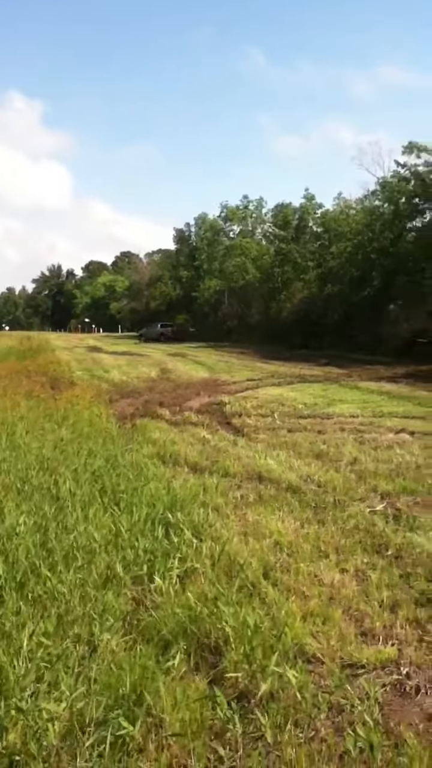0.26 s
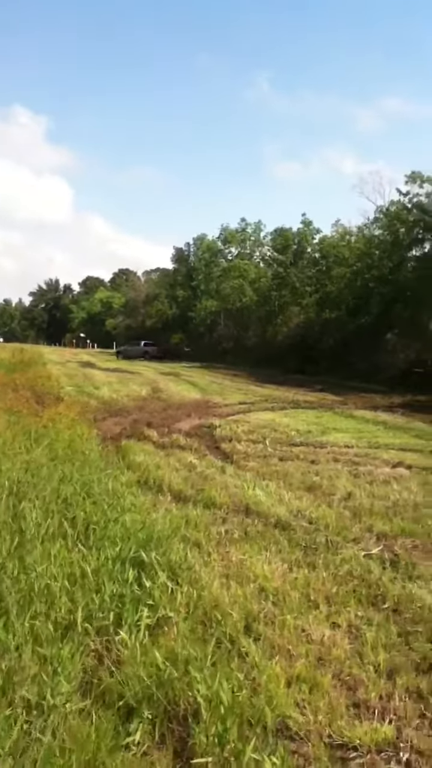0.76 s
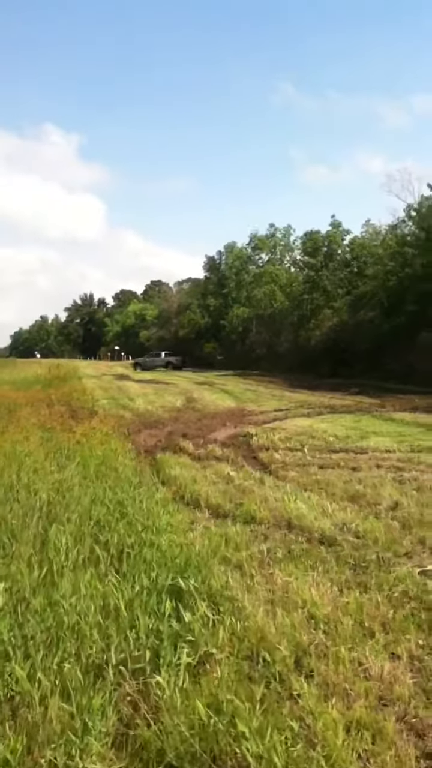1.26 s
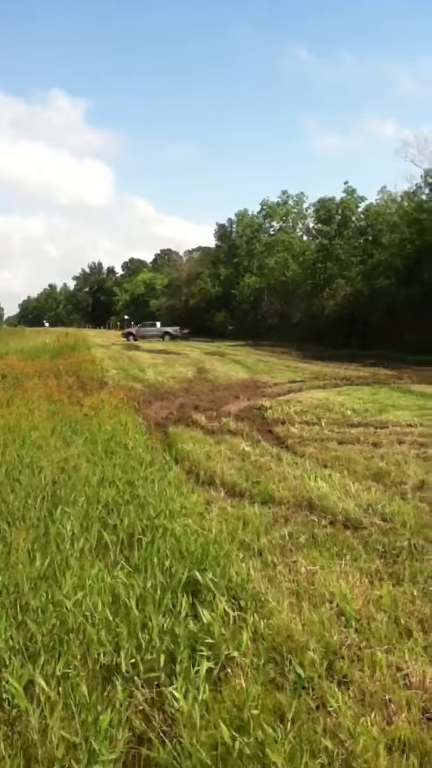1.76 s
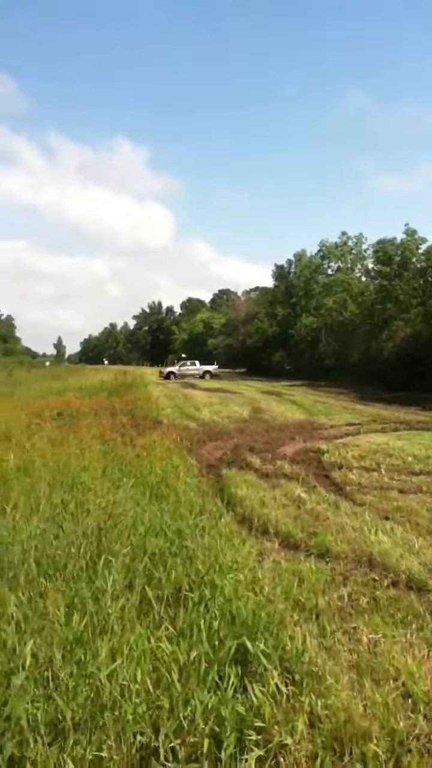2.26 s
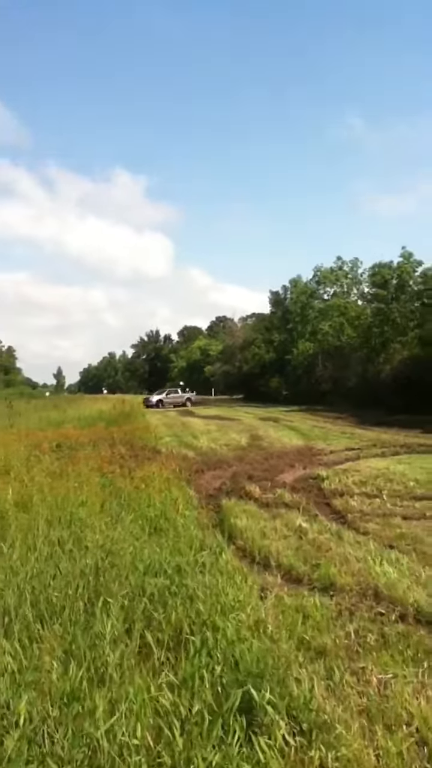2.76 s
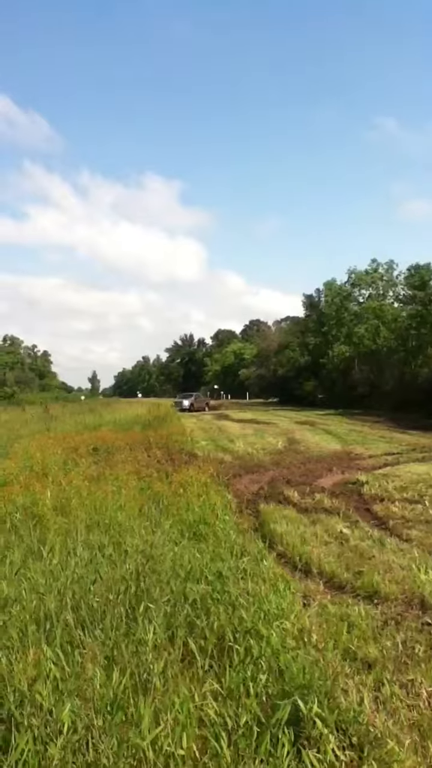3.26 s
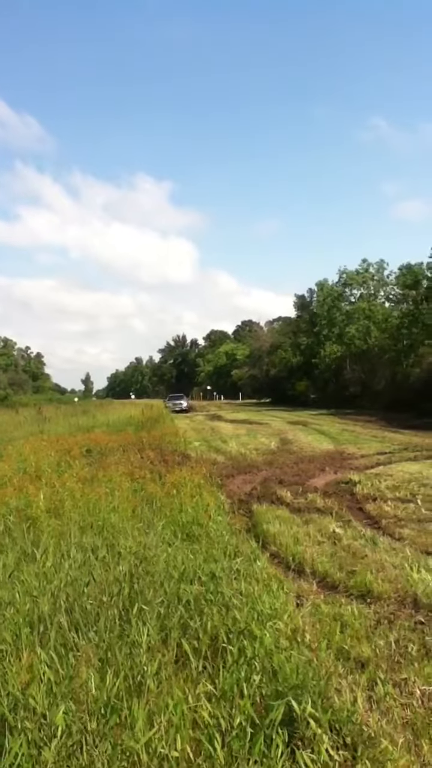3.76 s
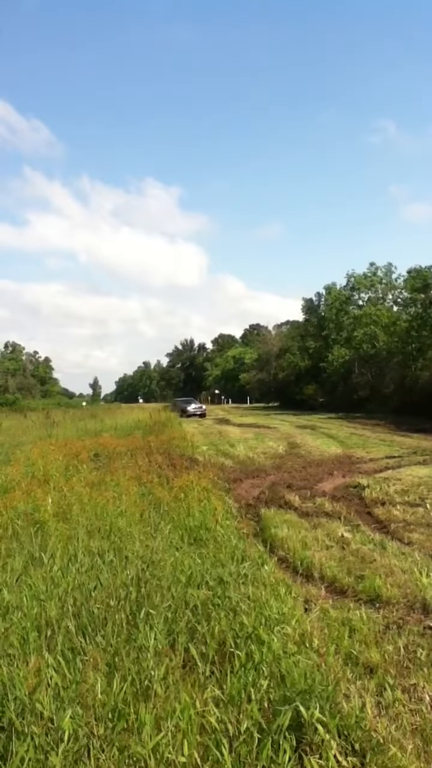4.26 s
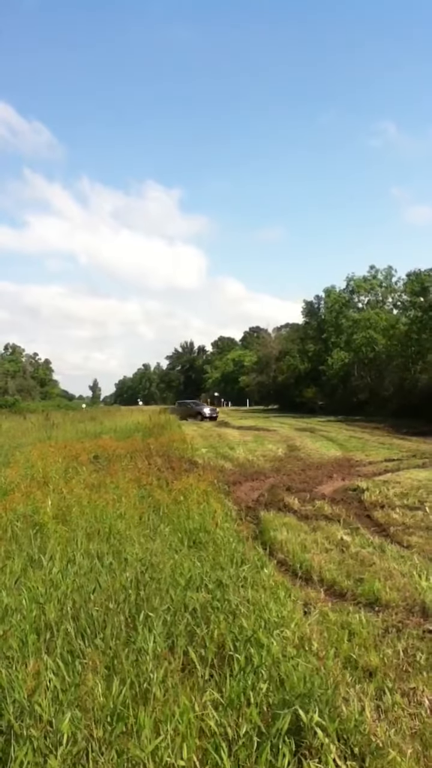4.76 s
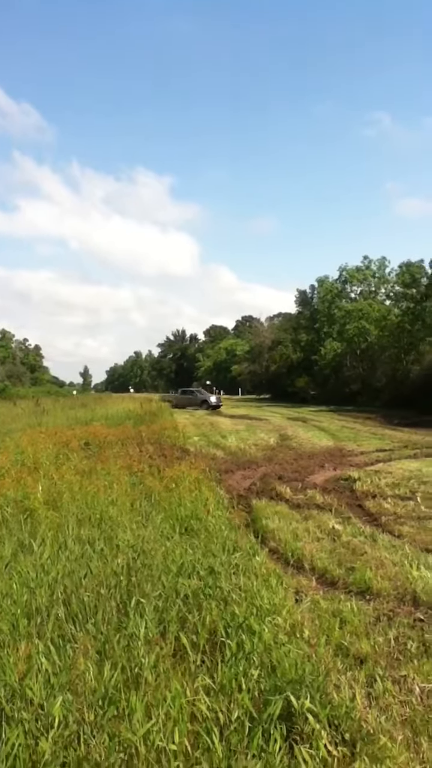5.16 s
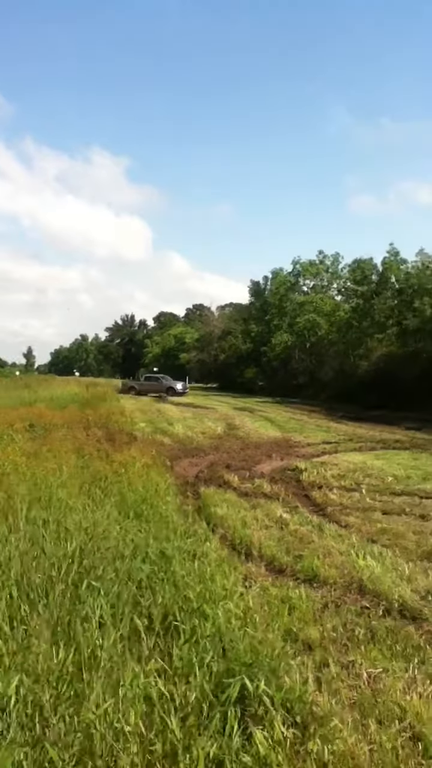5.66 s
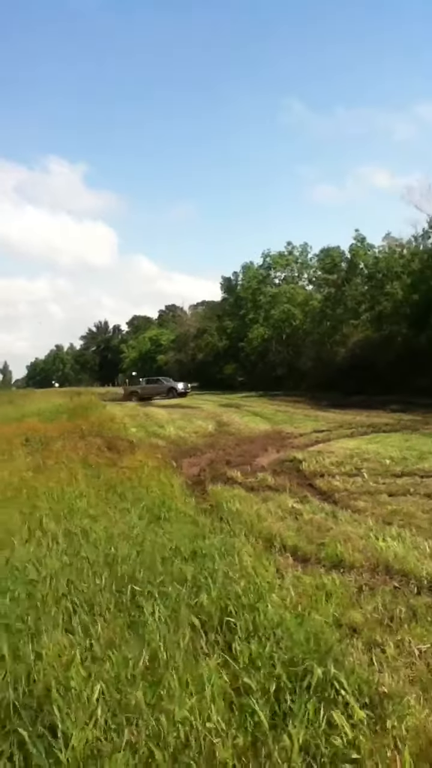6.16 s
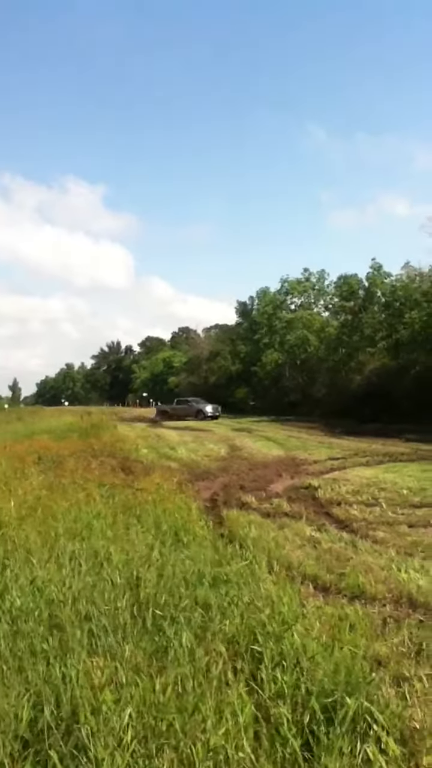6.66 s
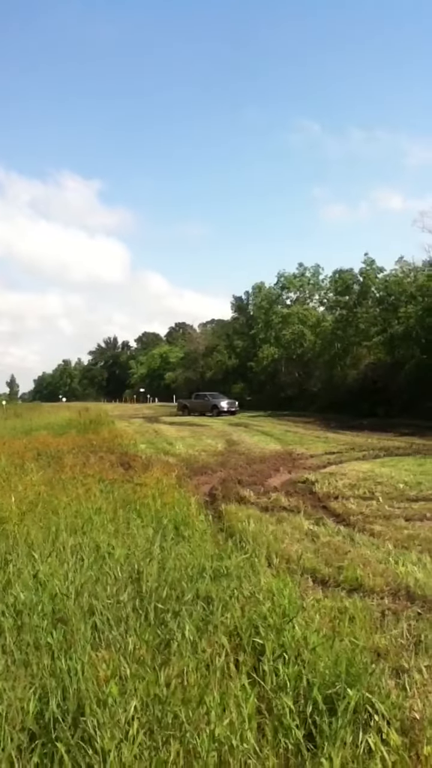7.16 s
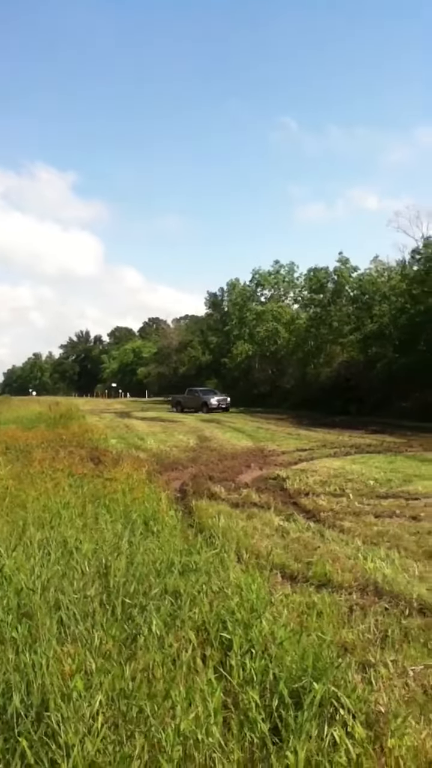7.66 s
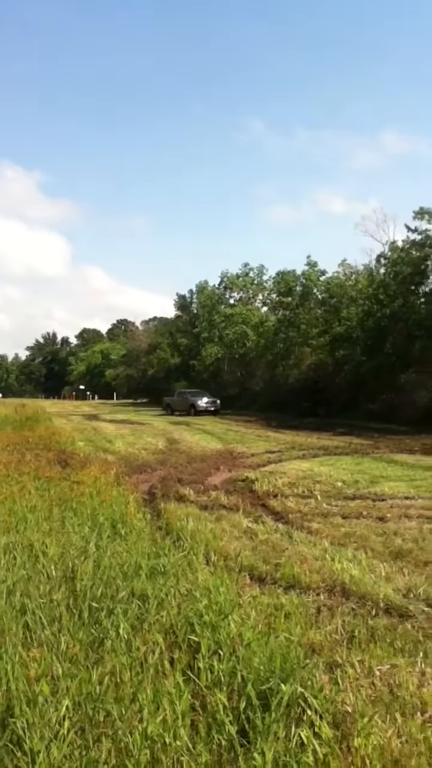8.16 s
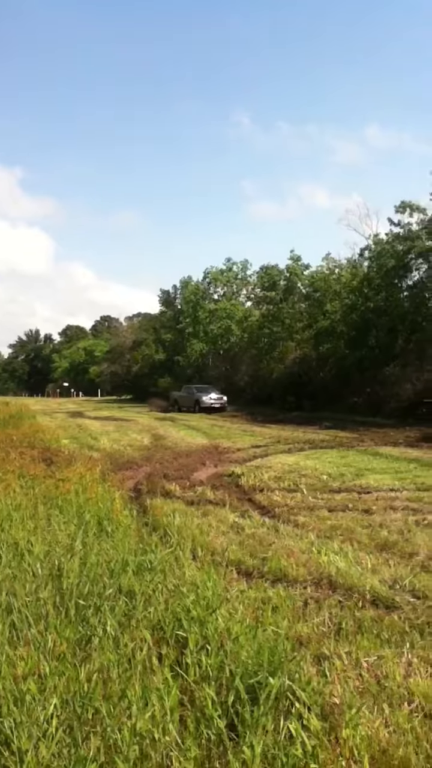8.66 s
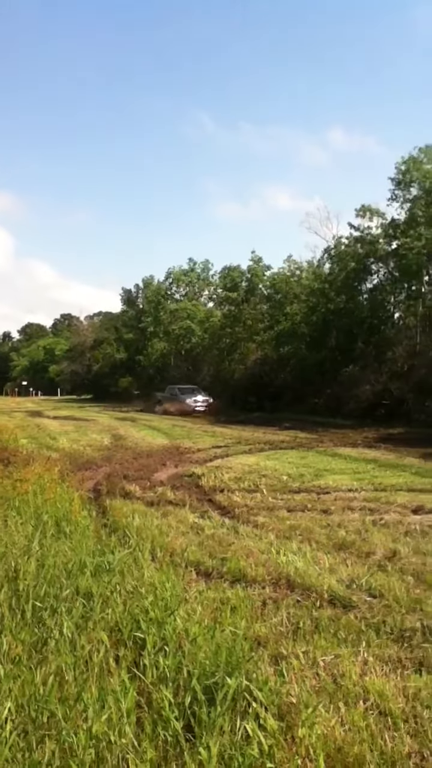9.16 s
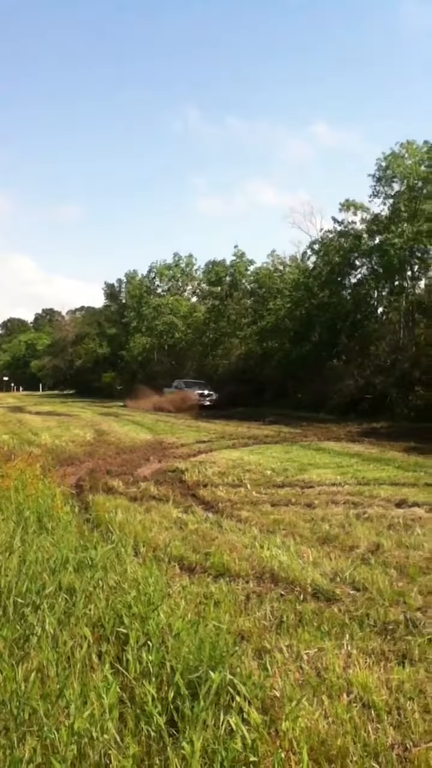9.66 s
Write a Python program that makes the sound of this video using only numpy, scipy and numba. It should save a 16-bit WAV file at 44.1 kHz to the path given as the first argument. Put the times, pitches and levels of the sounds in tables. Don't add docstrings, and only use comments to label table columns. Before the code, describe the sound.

Mono phone pickup in an open field with a faint airy hush. From 0 to 1.2 s wind flutters and thumps in low, soft blows, and nearby grass ticks and swishes, with small brushes until about 2 s. Around 1 s a V8 pickup tens of metres away begins to growl, its uneven exhaust beat climbing steadily to a high, burbling, raspy roar by 3.3 to 4.1 s, with wind bumps and a thin whine near 3.5 to 4 s. Revs drop at about 4.4 s, then climb again, pitch wobbling as tyres slip, to the loudest, brightest rush around 6 s. They fall to a deep lumpy throb near 7.3 s, waver until 8.2 s, then rise to another high pull near 9.6 s. Short whines flicker from 8.75 s onward; pitch eases slightly at the end. Trees scatter soft echoes.

```python
import sys
import numpy as np
from scipy import signal
from scipy.io import wavfile
from scipy.ndimage import uniform_filter1d
from numba import njit

SR = 44100
rng = np.random.default_rng(int(sys.argv[2]) if len(sys.argv) > 2 else 0)


def boost(x):
    u = np.asarray(x, float) / 20
    return 10 ** u


def bounce(signal):
    frames = np.transpose(np.atleast_2d(signal))
    limited = np.clip(frames, -1, 1)
    pcm = np.round(limited * 32767).astype(np.int16)
    wavfile.write(sys.argv[1], SR, pcm)


N = 437031
T = np.arange(N) / SR

# (time [s], rate [Hz])
CYCLE_RATE = [(0.82, 8.9), (1.27, 12.16), (1.6, 18.24), (3.38, 34.33), (3.83, 35.17), (4.1, 34.84),
              (4.44, 23.51), (4.85, 25.03), (6.07, 40.14), (6.42, 41.77), (6.65, 38.1), (7.36, 16.89),
              (7.59, 18.09), (7.66, 14.78), (7.96, 20.04), (8.16, 19.95), (9.63, 38.41), (9.91, 31.62)]
# (time [s], change of speed [%], length [s])
SPEED_WAVERS = [(1.87, 2.2, .35), (2.27, -1.5, .3), (2.59, -1.2, .25), (2.89, -2, .2), (3.09, 2.6, .3),
                (5.2, .7, .3), (5.53, -1.1, .25), (6.81, 1.8, .25), (7.09, -1.9, .25), (8.31, -2.5, .25),
                (8.62, 2.4, .35), (9.4, -.7, .5)]
# (time [s], firing beat [dB], lumpiness [dB], bank beat [dB re mean], burble [dB re mean])
EXHAUST_LOAD = [(.95, -49, -44, -20, -10), (1.15, -31.5, -41.5, -14, -8), (1.4, -23, -39.5, -2, -2),
                (2.05, -23, -40.5, 2.5, 3), (2.6, -20, -43.5, 1, 3), (3.3, -22, -34.5, -2, 2.5),
                (3.6, -24.5, -49.5, -6, -4.5), (4.05, -30, -42, -0.5, -2), (4.5, -23, -38, -3.5, -1),
                (5.12, -21, -36.5, -0.5, 3), (5.95, -22.5, -37, -0.5, 5), (6.3, -32, -43.5, 0.5, -5),
                (6.75, -29, -45, 2.5, 2), (7.15, -19, -39, -1.5, -2), (7.55, -23.5, -38.5, -2, -8),
                (8.2, -19, -38.5, -2, -5), (8.8, -29, -38, 1.5, -3), (9.91, -24.5, -37, -0.5, 2.5)]
# (time [s], depth [dB], length [s])
BEAT_FADES = [(1.71, -22, 0.063), (2.27, -15.5, 0.27), (2.85, -11, 0.47), (3.5, -4.5, 0.17),
              (4.16, -14, 0.056), (4.87, -14, 0.28), (5.29, -4, 0.14), (5.7, -4.5, 0.33), (6.62, -5, 0.14),
              (6.89, -18, 0.13), (7.32, -10, 0.17), (7.73, -3, .15), (7.99, -7, 0.092), (9.47, -22, 0.25),
              (9.61, -19, 0.17)]
# (frequency [Hz], level [dB])
TAILPIPE_TONE = [(50, -32), (62, -25), (75, -11), (100, -8), (135, -5.5), (190, 1), (215, -3.5)]
# (multiple of the cycle [-], level [dB])
UNEVEN_ORDERS = [(2, -5), (4, -4.5), (6, -2.5), (7, 4), (9, -1), (10, -2.5), (11, 1), (12, -12), (13, -0.5),
                 (14, -10)]
# (frequency [Hz], level [dB])
MUFFLER_TONE = [(40, -25), (70, -22), (110, -6), (170, -1.5), (240, -4.5), (305, -2.5), (335, -12.5),
                (380, -18.5), (430, -21.5), (520, -20)]
# (time [s], multiple of the cycle [-], level [dB], length [s])
PIPE_FLARES = [(3.0, 10, -36, .25), (3.27, 33, -42, .3), (4.4, 11, -36, .35), (4.75, 24, -50, .4),
               (6.3, 11, -50, .5), (2.4, 6, -38, .5), (7.6, 13, -39, .35), (4.25, 10, -38, .2),
               (1.15, 20, -44, .3), (4.65, 11, -39, .25), (3.3, 9, -38, .3), (8.7, 11, -41, .3),
               (9.05, 10, -40, .3), (1.3, 16, -35, .25), (1.6, 16, -43, .2), (1.97, 16, -47, .2),
               (2.5, 16, -46, .25), (2.85, 16, -50, .25), (5.75, 16, -50, .5), (7.32, 16, -31, .14),
               (7.5, 16, -36, .16), (7.72, 16, -33, .24), (7.96, 16, -34, .14), (8.28, 16, -43, .2)]
# (time [s], roar level [dB], brightness [dB])
GAS_FLOW = [(1.0, -57.5, 0), (1.8, -47, 3), (2.75, -42.5, -2.5), (2.97, -35.5, -1), (3.3, -34.5, 0),
            (4.0, -38, -1), (4.5, -41, -3), (4.85, -39, -2.5), (5.4, -29.5, -3.5), (5.75, -27, -0.5),
            (5.93, -22, 2), (6.15, -22.5, 3), (6.32, -27.5, 1), (6.95, -33.5, 1), (7.7, -44, -0.5),
            (8.25, -39.5, -2.5), (8.45, -34.5, -1), (9.3, -33, 1.5)]
# (frequency [Hz], width [Hz], level [dB])
PIPE_MODES = [(736, 234, -3.5), (1150, 190, 5), (1709, 230, 2.5), (2294, 264, 0.5), (2782, 330, -5),
              (3656, 290, -3.5), (4230, 540, -10)]
# (frequency [Hz], width [Hz], level [dB])
TREBLE_MODES = [(5610, 980, -3.5), (6020, 260, 1), (6830, 2180, -0.5), (8500, 3900, -12.5)]
# (time [s], stretch of its resonances [x], second resonance [Hz],
# ring over plain rush [dB], top air [dB])
PIPE_SWING = [(1.0, 1, 1110, -5, -13), (2.3, 0.94, 1105, 2.5, -5), (3.2, .98, 1134, 3.5, -16),
              (4.4, 1, 1125, 0, -18), (5.0, 1.006, 1094, 6, -12), (5.5, 1, 1177, 10, -12),
              (6.0, 1.01, 1204, 5.5, -18), (6.6, 1.01, 1020, 1, -13), (7.0, 0.997, 1100, 1.5, -10.5),
              (7.7, 0.99, 1104, 0, -21), (9.0, 1.005, 1130, -3, -8.5), (9.91, 0.96, 1090, -1, -7)]
# (start [s], end [s], level [dB])
BONNET_FACING = [
    (3.5, 4.03, -43),
    (4.1, 4.22, -50),
    (8.75, 8.92, -47),
    (9.0, 9.1, -46),
    (9.15, 9.33, -39),
    (9.4, 9.7, -46),
    (9.75, 10.2, -41),
]
# (time [s], flutter level [dB])
GUST_FLUTTER = [
    (0, -41),
    (.2, -41),
    (.35, -35),
    (.5, -37),
    (.65, -43),
    (.8, -46),
    (1.0, -40.5),
    (1.2, -68),
]
# (time [s], peak level [dB], centre frequency [Hz], length [cycles])
WIND_THUMPS = [(.105, -28, 130, 1.6), (0.149, -27, 103, 1.9), (.213, -33, 190, 2.2), (.245, -33, 114, 2.4),
               (.27, -37, 330, 3.2), (.303, -22, 202, 0.9), (.345, -21, 116, 1.4), (0.334, -28, 260, 3.1),
               (.43, -20, 115, 1.1), (.455, -19, 200, 1.1), (.56, -19.5, 200, 0.94),
               (0.564, -31.5, 407, 4.4), (0.321, -32, 366, 2.8), (.68, -32, 140, 1.3), (.76, -28, 119, 2.4),
               (2.48, -34, 70, 2.2), (2.72, -31, 75, 1.9), (3.225, -22.5, 109, 2), (3.28, -32, 75, 1.8),
               (3.928, -23.5, 105, 1.9), (3.99, -22, 126, 2), (4.53, -31, 90, 2), (5.38, -40, 60, 3),
               (6.1, -32, 80, 2.3)]
# (time [s], peak level [dB], length [s])
GRASS_RUSTLES = [
    (.21, -44, .02),
    (0.406, -39.5, 0.054),
    (0.468, -40, 0.08),
    (0.566, -40, 0.026),
    (1.084, -43, 0.013),
    (1.172, -32.5, 0.026),
    (1.22, -39, 0.065),
    (1.844, -37, .02),
    (1.995, -38, .02),
    (2.124, -39, .03),
]
# (frequency [Hz], level [dB per Hz])
FIELD_TONE = [(300, -24), (640, 6), (920, 5), (1390, -3), (2440, -26), (4000, -10.5), (6350, -9),
              (10100, -17.5), (12500, -24), (15500, -19)]


def unit(x):
    return x / np.sqrt(np.mean(x ** 2))


def curves(table):
    s, *columns = np.transpose(table)
    return [np.interp(T, s, c) for c in columns]


def colour(table, hz):
    f, db = np.transpose(table)
    return np.interp(np.log(hz), np.log(f), db)


def bell(s, length_s):
    return np.exp(-(2 * (T - s) / length_s) ** 2)


def bumps(table):
    return sum(size * bell(s, length_s) for s, size, length_s in table)


@njit
def svf(x, hz, width):
    y, b, l = np.empty(len(x)), 0., 0.
    for i in range(len(x)):
        g, k = np.tan(np.pi * hz[i] / SR), width / hz[i]
        v = (b + g * (x[i] - l)) / (1 + g * (g + k))
        b, l, y[i] = 2 * v - b, l + 2 * g * v, k * v
    return y


def band(hz, width):
    hz, width = hz * np.ones(N), 1. * width
    once = svf(rng.standard_normal(N), hz, width)
    return unit(svf(once, hz, width))


def walk(rate):
    k = int(SR / rate)
    steps = np.repeat(rng.standard_normal(N // k + 1), k)
    return 1.38 * uniform_filter1d(uniform_filter1d(steps, k), k)[:N]


def exhaust(hz, turn):
    fire_db, lump_db, bank_db, burble_db = curves(EXHAUST_LOAD)
    fire_db = fire_db + bumps(BEAT_FADES)
    bank_db = -26 + bank_db + colour(TAILPIPE_TONE, 4.9 * hz)
    burble_db = -32 + burble_db + colour(TAILPIPE_TONE, 3 * hz)

    def order(k, db, waver_db, slip):
        level = np.sqrt(2) * boost(db + waver_db * walk(18))
        return level * np.sin(k * turn + slip * walk(13) + 2 * np.pi * rng.random())

    strong = order(8, fire_db, 1.0, .12) + order(5, bank_db, .7, .1) + order(16, -58.5, 1.5, .25)
    burble = order(3, burble_db, 1.0, .12)
    weak = 0
    for k, db in UNEVEN_ORDERS:
        weak_db = lump_db + db + colour(MUFFLER_TONE, k * hz) + 2.6 * walk(4)
        weak = weak + order(int(k), weak_db, 3.2, 0.38)
    scatter = boost(lump_db - 2.0) * band(np.clip(6 * hz, 60, 240), 167)
    fade_in = np.clip((T - .8) / 0.27, 0, 1)
    return (strong + burble + weak + scatter) * fade_in


def flares(turn):
    out = 0
    for s, k, db, length_s in PIPE_FLARES:
        out = out + np.sqrt(2) * boost(db) * bell(s, length_s) * np.sin(k * turn + .5 * walk(11))
    return out


def roar(turn):
    db, bright_db = curves(GAS_FLOW)
    stretch, second_hz, ring_db, air_db = curves(PIPE_SWING)

    def mode(hz, width, mode_db):
        level = boost(mode_db + .7 * walk(3) + 1.8 * walk(9)) * np.sqrt(width)
        return level * band(hz * (1 + .012 * walk(4)), width)

    ring = np.sqrt(1 / (1 + boost(-2 * ring_db)))
    rush = np.sqrt(1 - ring ** 2)
    low_ring = unit(mode(*PIPE_MODES[0]) + mode(second_hz, *PIPE_MODES[1][1:]))
    low = ring * low_ring + rush * band(1033, 1180)
    middle_ring = unit(sum(mode(f * stretch, w, d + 0.74 * bright_db * np.log2(f / 2300))
                           for f, w, d in PIPE_MODES[2:]))
    middle_rush = unit(band(2120, 2750) + boost(-7.5 + 0.5 * bright_db) * band(4120, 1900))
    middle = ring * middle_ring + rush * middle_rush
    high = unit(sum(mode(*m) for m in TREBLE_MODES)) + boost(air_db) * band(10400, 7900)
    low_db = -4 - 1.04 * bright_db
    high_db = -6.5 + 0.7 * bright_db + 0.69 * walk(20)
    gas = boost(low_db) * low + middle + boost(high_db) * high
    far = signal.sosfilt(signal.butter(3, 11400, fs=SR, output="sos"), gas)
    puff = 1 + 0.093 * np.cos(8 * turn) + 0.083 * np.cos(3 * turn)
    return boost(db - 0.18 + .5 * walk(7)) * puff * far


def whine(turn):
    edge_s = .06
    facing = 0
    for start, end, db in BONNET_FACING:
        facing = facing + boost(db) * np.clip(np.minimum(T - start, end - T) / edge_s + 1, 0, 1)
    return np.sqrt(2) * facing * boost(3 * walk(14)) * np.sin(72 * turn + .3 * walk(30))


def trees(x, t60_s=1.0, first_s=0.082):
    t = np.arange(int(.6 * SR)) / SR
    tail = rng.standard_normal(len(t)) * np.exp(-np.log(1000) * t / t60_s) * (t > first_s)
    return signal.fftconvolve(x, tail / np.sqrt(np.sum(tail ** 2)))[:N]


def wind():
    breeze = unit(band(131, 154) + boost(-20.5) * band(35, 60))
    out = boost(-44.5 + 1.1 * walk(1.16) + 1.9 * walk(11)) * breeze
    out += boost(curves(GUST_FLUTTER)[0] + 3.6 * walk(34.6)) * band(120, 113)
    for s, db, hz, cycles in WIND_THUMPS:
        wave = np.cos(2 * np.pi * hz * (T - s) + 2 * np.pi * rng.random())
        out += boost(db) * bell(s, cycles / hz) * wave
    return out


def field():
    hush = 0
    for hz in 330 * 2 ** np.arange(0, 5.6, .5):
        level = boost(colour(FIELD_TONE, hz) + 0.73 * walk(6.8)) * np.sqrt(hz)
        hush = hush + level * band(hz, hz / 1.55)
    brushes = sum(boost(db - 9.5) * bell(s, length_s) for s, db, length_s in GRASS_RUSTLES)
    return boost(-47) * unit(hush) + brushes * band(5200, 8900)


def scene():
    hz = curves(CYCLE_RATE)[0]
    flywheel_s = .13
    for _ in range(2):
        hz = uniform_filter1d(hz, int(flywheel_s * SR), mode="nearest")
    hz = hz * (1 + bumps(SPEED_WAVERS) / 100)
    turn = 2 * np.pi * np.cumsum(hz) / SR
    pipe = exhaust(hz, turn)
    truck = pipe + roar(turn) + whine(turn) + flares(turn)
    mono = truck + boost(-14.5) * trees(pipe) + wind() + field()
    return np.array([mono, mono])


def thin_top(x, gate_db=-94, follow=.38, rise_db=.8):
    hz, _, z = signal.stft(x, SR, "cosine", nperseg=2048)
    middle_power = np.sum(np.abs(z[:, 90:370]) ** 2, axis=1, keepdims=True)
    loud_db = 10 * np.log10(middle_power + 1e-12)
    gate = boost(gate_db + follow * (loud_db + 58) + rise_db * (hz[:, None] - 13000) / 1000)
    return signal.istft(z * (np.abs(z) > gate), SR, "cosine", nperseg=2048)[1][:, :N]


def low_pass(x):
    return signal.sosfilt(signal.butter(12, 15630, fs=SR, output="sos"), x)


def record(dry):
    circuit_tone = boost(-77) * np.sin(2 * np.pi * 14994 * T)
    mix = thin_top(dry + circuit_tone)
    return low_pass(mix)


dry = scene()
out = record(dry)
bounce(out)
```